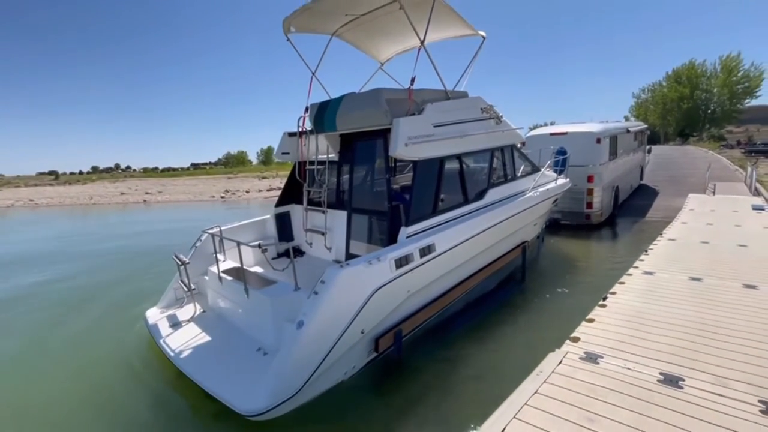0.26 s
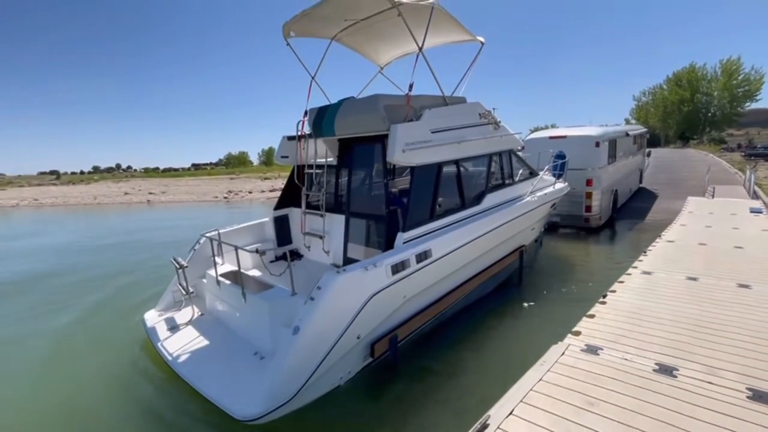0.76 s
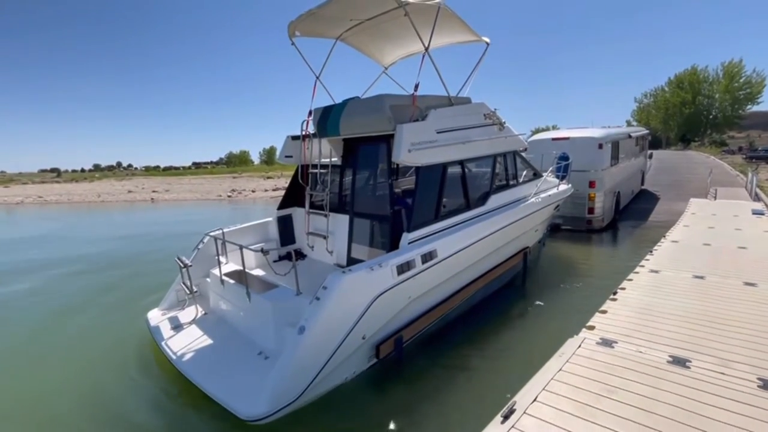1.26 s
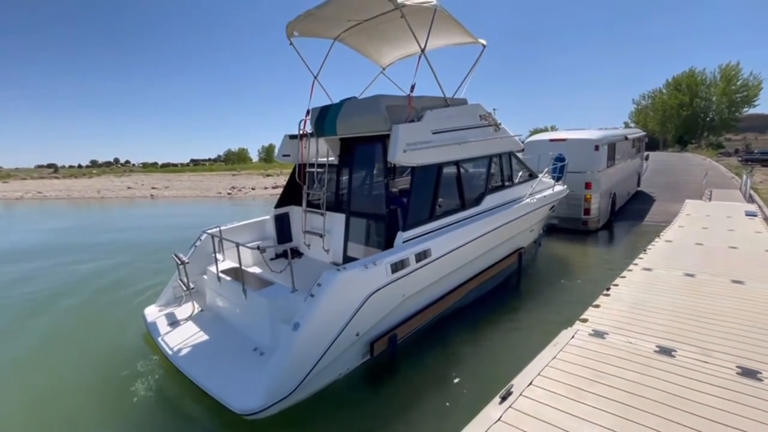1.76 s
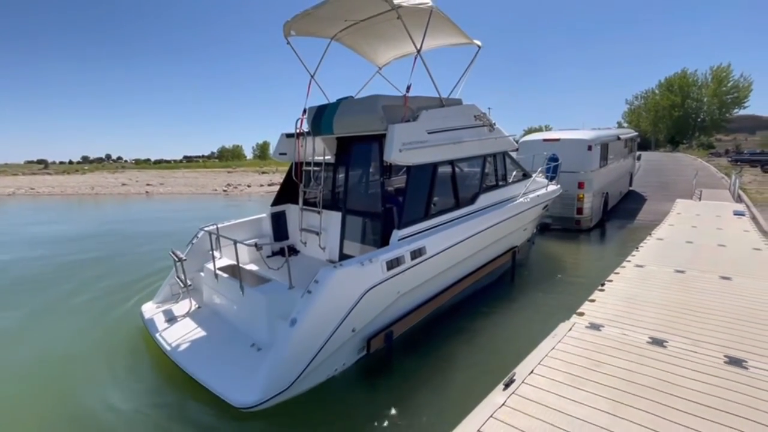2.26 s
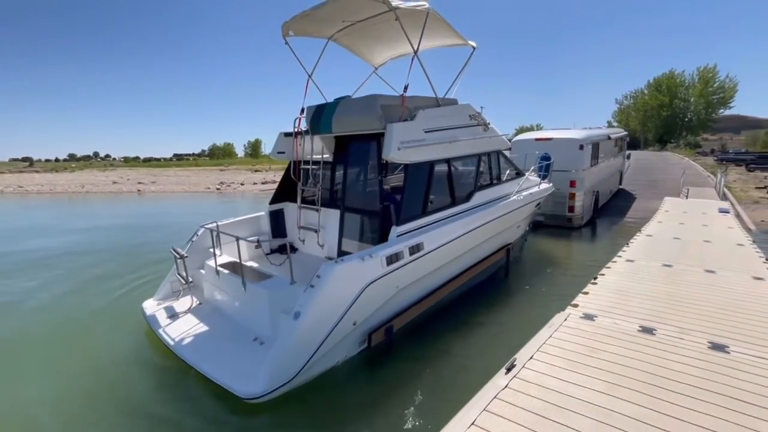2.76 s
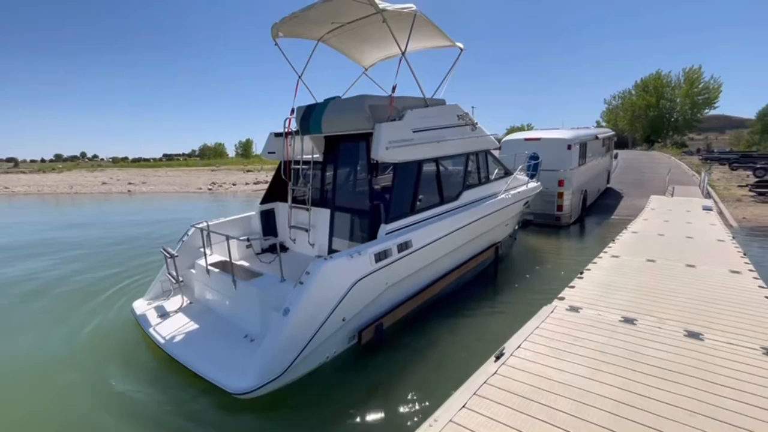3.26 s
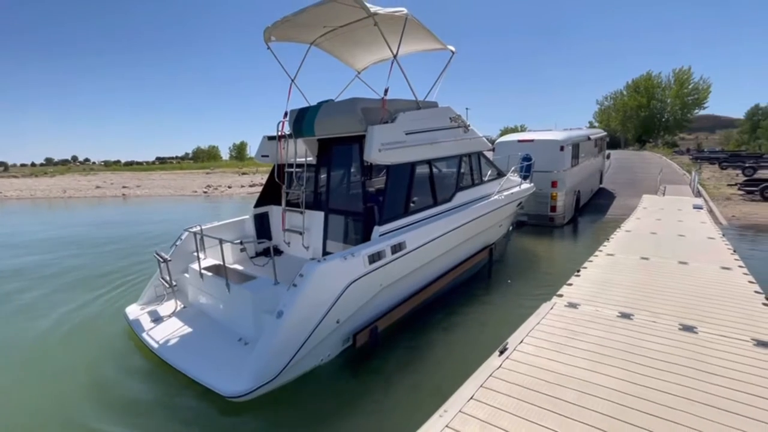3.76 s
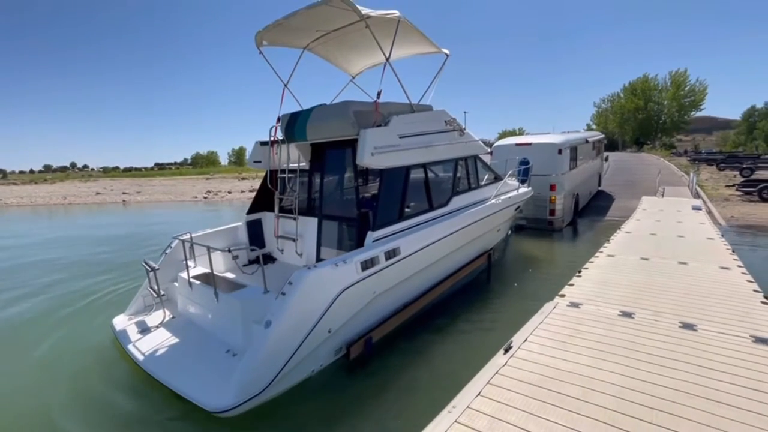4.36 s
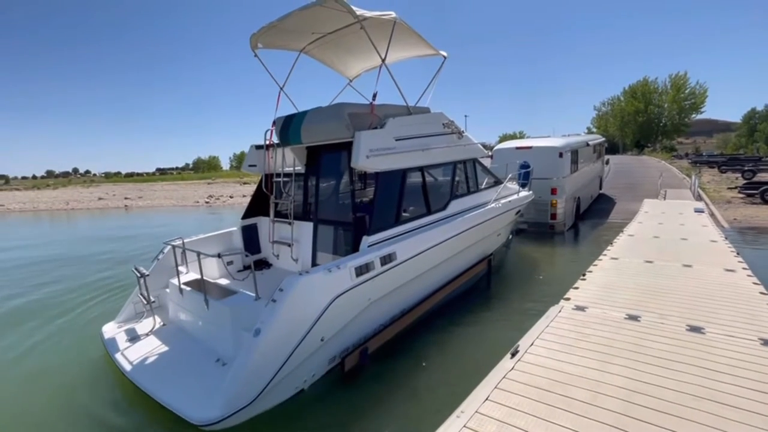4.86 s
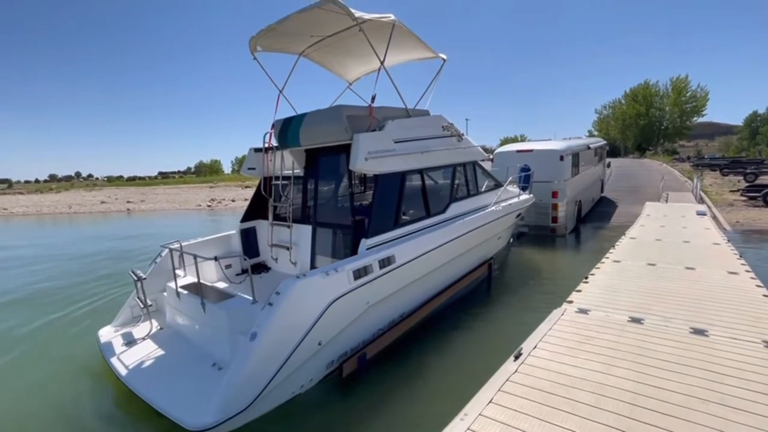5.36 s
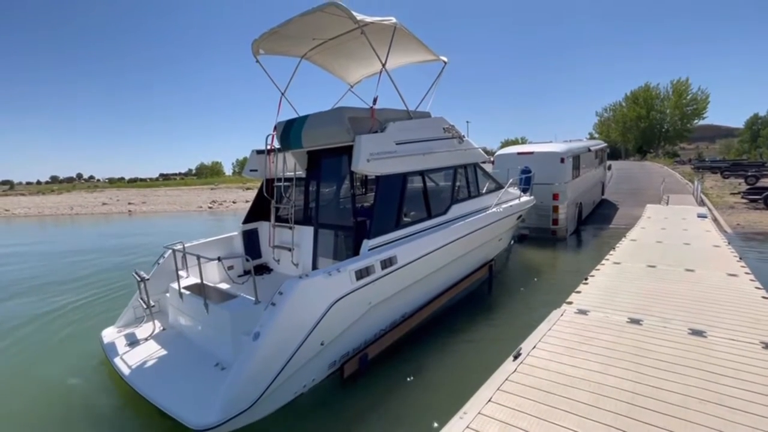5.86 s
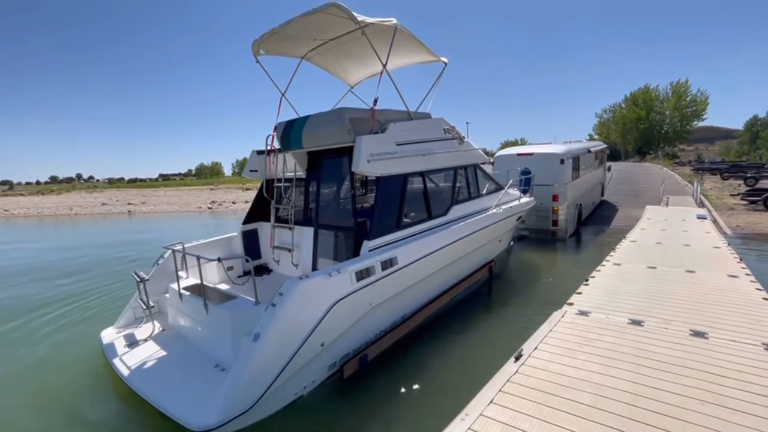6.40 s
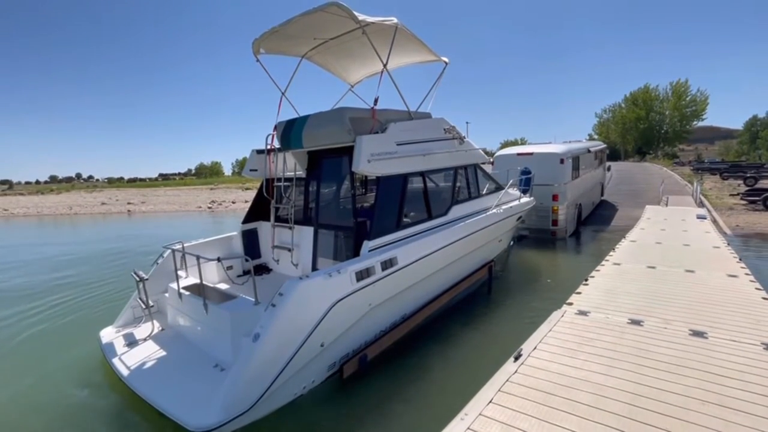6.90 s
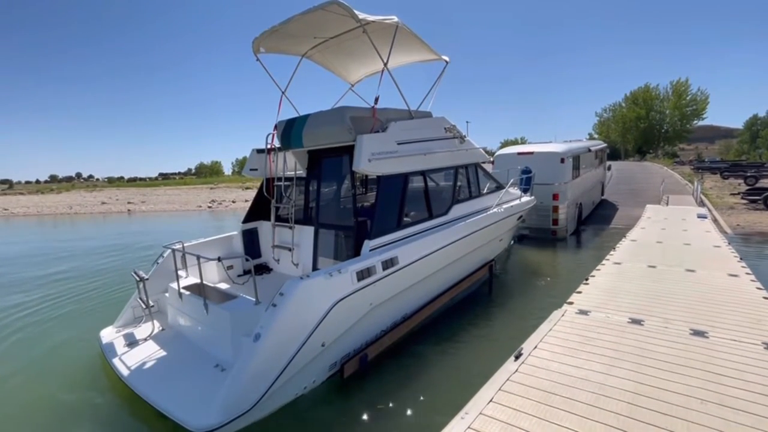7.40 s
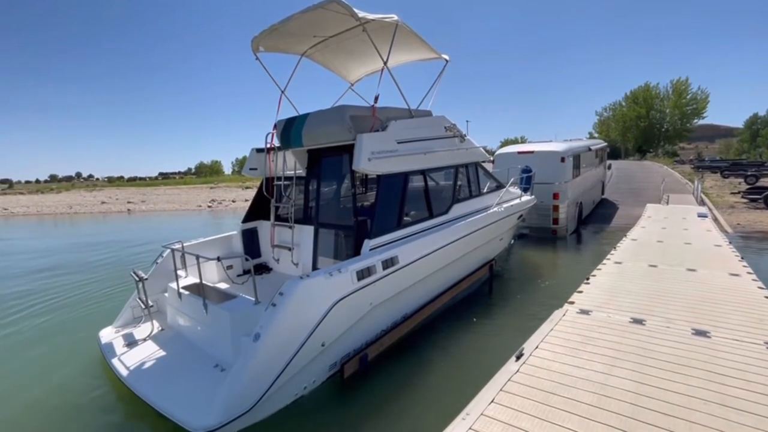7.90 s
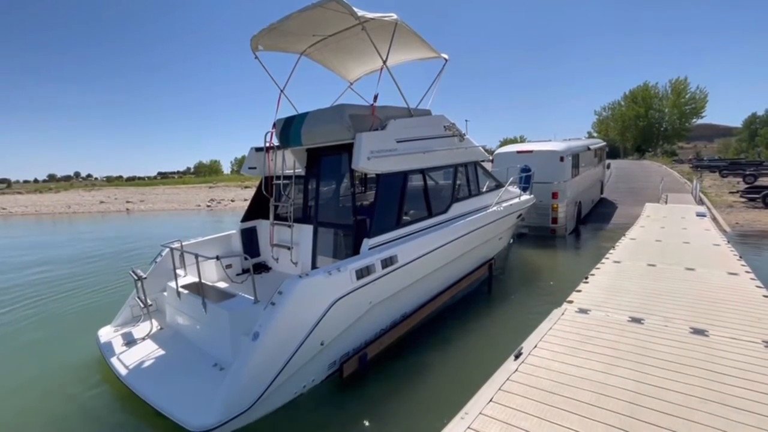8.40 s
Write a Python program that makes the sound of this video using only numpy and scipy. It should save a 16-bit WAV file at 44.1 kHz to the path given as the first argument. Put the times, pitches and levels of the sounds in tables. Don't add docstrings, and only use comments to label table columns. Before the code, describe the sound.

A big engine idles with an uneven lope by the water while vehicle brakes groan, blast air with a falling whistle, squeak, then vent softly.

```python
import sys
import numpy as np
from scipy import signal
from scipy.fft import rfft, irfft, dct
from scipy.io import wavfile
from scipy.ndimage import uniform_filter1d

SR = 44100
rng = np.random.default_rng(int(sys.argv[2]) if len(sys.argv) > 2 else 0)


def decibels_to_gain(level_db):
    exponent = np.asarray(level_db, float) / 20
    return 10 ** exponent


def wav_record(signal):
    frames = np.transpose(np.atleast_2d(signal))
    bounded = np.clip(frames, -1, 1)
    quanta = np.round(bounded * 32767).astype(np.int16)
    wavfile.write(sys.argv[1], SR, quanta)


N = 381024
T = np.arange(N) / SR

# time_s, cycle_hz
CRANK = [(0.0, 12.672), (1.6, 12.698), (2.4, 12.674), (2.8, 12.709), (3.2, 12.836), (4.4, 12.823),
         (5.2, 12.751), (6.4, 12.725), (6.8, 12.752), (7.75, 12.748)]
FIRINGS = [(.1889, 2.035), (.3601, 1.164), (.6388, .302), (.69, 2.145), (.914, .501), (.9433, .92)]
# time_s, level_db
FACING = [(0.0, 0.3), (1.0, -.9), (1.7, -3.4), (2.4, -3.4), (3.6, -2.5), (4.6, -2), (5.3, -4), (5.9, -3.6),
          (6.4, -5), (7.5, -4.6), (8.64, -9)]
FUEL_STOPS_S, FUEL_STOP_RISE_S = 7.79, .04
ENGINE_CUT_DB, ENGINE_FADE_DB = -5, -8


def evened(x):
    return x / np.sqrt(np.mean(x ** 2) + 1e-20)


def columns(rows):
    s, *values = np.transpose(rows)
    return [np.interp(T, s, v) for v in values]


def span(start, end):
    return slice(max(round(start * SR), 0), round(end * SR))


def wander(hz, count=1):
    size = N // 32
    smooth = 1 + (np.fft.rfftfreq(size, 32 / SR) / hz) ** 4
    spectrum = rfft(rng.standard_normal((count, size))) / smooth
    return evened(irfft(spectrum, size)).repeat(32, axis=1)


def coloured(x, points):
    f, db = np.transpose(points)
    log_hz = np.log(np.fft.rfftfreq(N, 1 / SR) + 1)
    gain = decibels_to_gain(np.interp(log_hz, np.log(f + 1), db, -120, -120))
    return evened(irfft(rfft(x) * gain, N))


def noise(points):
    return coloured(rng.standard_normal((2, N)), points)


def bounced(x, bumps):
    f = np.fft.rfftfreq(N, 1 / SR)
    gain_db = sum(db * np.exp(-((f - hz) / width) ** 2) for hz, width, db in bumps)
    return irfft(rfft(x) * decibels_to_gain(gain_db), N)


def swell(start, rise, hold, db, shape, t=T):
    rise_power, fall_db, fall_power = shape
    after = np.maximum(t - start - rise - hold, 0)
    fall = decibels_to_gain(np.maximum(db + fall_db * after ** fall_power, -150))
    return np.clip((t - start) / rise, 0, 1) ** rise_power * fall


def fuel_cut_db(step_db, fade_db, power=1):
    drop = step_db * np.clip((T - FUEL_STOPS_S) / FUEL_STOP_RISE_S, 0, 1)
    return drop + fade_db * np.maximum(T - FUEL_STOPS_S, 0) ** power


def strokes(turns, pattern, power):
    return sum(a ** power * (np.diff((turns - place) // 1, prepend=-1) > 0) for place, a in pattern)


def jet(gain, points, flicker_db):
    return gain * decibels_to_gain(flicker_db * wander(40.0)) * noise(points)


def tone(start, end, hz, levels, wobble, flutter_db):
    on, out = span(start, end), np.zeros(N)
    flutter = wander(30.0, count=len(levels))[:, on]
    turns = np.cumsum(hz * (1 + wobble * wander(62.0)[0, on])) / SR
    stack = sum(decibels_to_gain(db + flutter_db * flutter[k]) * np.cos(2 * np.pi * (k + 1) * turns)
                for k, db in enumerate(levels))
    edge = np.clip(np.minimum(T[on] - start, end - T[on]) / .012, 0, 1)
    out[on] = np.sqrt(2) * stack * edge
    return out


def crank_turns():
    off_s, sag_hz_per_s = 7.78, 3.75
    cycle_hz = columns(CRANK)[0] - sag_hz_per_s * np.maximum(T - off_s, 0)
    return np.cumsum(cycle_hz) / SR


def exhaust(turns):
    # cycle_order, rms_db
    order_levels = [(3, -47.5), (4, -43), (5, -47), (6, -41), (7, -54.5), (8, -52.5), (9, -32), (10, -39.5),
                    (11, -38), (12, -20.5), (13, -31.0), (14, -39.5), (15, -40), (16, -32.5), (17, -34.5),
                    (18, -36), (19, -36.5), (21, -41.5), (22, -31), (23, -32), (24, -42), (25, -37.5),
                    (26, -43), (28, -50), (32, -47.5), (33, -57.5), (34, -48.5), (35, -46.5), (36, -54)]
    pipe_hz, pipe_width_hz, pipe_turn_rad = 253.5, 188, -.654
    facing_db = columns(FACING)[0]
    boom_db = .6 + .25 * facing_db
    firing_db = boom_db + fuel_cut_db(-2.8, -14, 3.0)
    low_db = boom_db + fuel_cut_db(ENGINE_CUT_DB, ENGINE_FADE_DB)
    growl_db = -1.4 - .4 * facing_db + fuel_cut_db(ENGINE_CUT_DB, ENGINE_FADE_DB)
    place, strength = np.transpose(FIRINGS)
    flutter, out = wander(8.0, count=4), np.zeros(N)
    firing, low, growl = (decibels_to_gain(db + 0.18 * flutter[3]) for db in (firing_db, low_db, growl_db))
    for order, db in order_levels:
        hz = order * CRANK[0][1]
        pipe = 1j * hz / (pipe_hz ** 2 - hz ** 2 + 1j * hz * pipe_width_hz)
        firings = np.sum(strength * np.exp(-2j * np.pi * order * place))
        lag = np.angle(pipe * firings) + pipe_turn_rad
        load = firing if order == 12 else low if order < 14.5 else growl
        shake = .004 * order * flutter[int(order) % 3]
        out += decibels_to_gain(db) * load * np.cos(2 * np.pi * order * turns + lag + shake)
    return np.sqrt(2) * out


def block(turns):
    # pitch_hz, density_db (dB per Hz)
    rumble_colour = [(25, -29), (45, -7), (60, -7), (150, -7), (300, -1.5), (360, -4), (450, -18.5),
                     (560, -13)]
    clatter_colour = [(260, -37), (450, 0.5), (478, -11), (514, -17), (615, -14.5), (670, -10.5),
                      (807, -2.5), (863, -2.5), (940, -4.5), (1050, -6), (1130, -10.5), (1550, -14.5),
                      (2200, -25), (2860, -58), (4840, -120)]
    fizz_colour = [(1180, -7), (2000, -5), (2360, -3), (2830, -2), (3190, -4.5), (3540, -5), (5050, -13.5),
                   (5600, -17.5), (6480, -11), (7450, -21.5), (8190, -20), (10500, -27), (12500, -30),
                   (14000, -26.5), (14900, -39.5), (15800, -56)]
    facing_db = columns(FACING)[0]
    puff = sum((a / 2) ** 3 * np.exp(-((turns - place) % 1) / 0.037) for place, a in FIRINGS)
    knocks = strokes(turns, FIRINGS, 0.6) * decibels_to_gain(1.3 * rng.standard_normal(N))
    knocks = coloured(knocks, clatter_colour) * [[1], [0]]
    clatter = noise(clatter_colour) * (1 + 0.34 * puff) * decibels_to_gain(.9 * wander(15.0))
    clatter = evened(clatter + 0.27 * knocks)
    fizz = evened(noise(fizz_colour) * (1 + 0.57 * puff) * decibels_to_gain(1.1 * wander(20.0)))
    rumble = decibels_to_gain(-36 + fuel_cut_db(0.1, -4)) * noise(rumble_colour)
    return rumble + decibels_to_gain(-36 + facing_db) * clatter + decibels_to_gain(-46 + 1.1 * facing_db) * fizz


def rattle(turns):
    # cycle_order, rms_db
    rattle_levels = [(40, -53.5), (42, -60), (43, -62), (46, -57), (51, -58.5), (53, -51.5), (55, -57),
                     (60, -52.5), (64, -51), (68, -52.5), (70, -53.5), (83, -54), (99, -59.5), (107, -59),
                     (125, -58)]
    sway = wander(4.6, count=len(rattle_levels) + 1)
    facing_db = np.interp(T, [4.6, 5.6], [-9, 0])
    shaken = turns + .002 * sway[-1]
    lines = np.zeros(N)
    for (order, db), s in zip(rattle_levels, sway):
        level = decibels_to_gain(db + 2.4 * s + (order < 50) * facing_db)
        lines += level * np.cos(2 * np.pi * (order * shaken + rng.random()))
    return np.sqrt(2) * lines * decibels_to_gain(fuel_cut_db(ENGINE_CUT_DB, ENGINE_FADE_DB) - 4)


def far_engine():
    # cycle_order, rms_db
    far_levels = [(3, -50.5), (4, -38.5), (5, -44), (6, -38), (8, -38.5), (10, -40.5)]
    cycle_hz = 15.0 * (1 + 0.0062 * wander(0.68)[0])
    turns = np.cumsum(cycle_hz) / SR
    sway = wander(3.0, count=len(far_levels))
    lines = sum(decibels_to_gain(db + 2.2 * s) * np.cos(2 * np.pi * (order * turns + rng.random()))
                for (order, db), s in zip(far_levels, sway))
    return np.sqrt(2) * lines


def air_leak():
    # pitch_hz, density_db (dB per Hz)
    leak_colour = [(1500, -9), (2250, -14), (2900, 0.1), (3600, -9), (5500, -17), (6400, -5), (7600, -20),
                   (14500, -27), (15100, -45)]
    gain = swell(start=-.1, rise=.2, hold=2.8, db=-54, shape=(.7, -60, 1.0))
    return jet(gain, leak_colour, 1.1)


def groans():
    # start_s, rise_s, hold_s, fall_db (after 1 s), level_db
    groan_rows = [
        (-.1, .12, 1.21, -170, -30.7),
        (3.86, .72, .1, -14, -25.5),
    ]
    # first_hz, last_hz, settle_s
    groan_pitch = [(394, 411, .25), (391, 405, .8)]
    ends_s = (1.29, 5.6)
    out, stutter_db = np.zeros(N), -3 * abs(wander(18.0)[0]) * (T < .36)
    for (start, rise, hold, fall_db, db), (first, last, settle), end in zip(groan_rows, groan_pitch, ends_s):
        on = span(start, end)
        hz = last + (first - last) * np.exp(-(T[on] - start) / settle)
        sung = tone(start, end, hz, [stutter_db[on]], 0.0016, 0.35)
        out += swell(start, rise, hold, db, (.6, fall_db, 1)) * sung
    return out


def ticks():
    # start_s, peak_db, length_s
    short_ticks = [(1.124, -50, .003), (1.1443, -42, 0.004), (1.23, -45, 0.004), (1.5524, -47, 0.004),
                   (1.5994, -50, 0.004), (2.062, -57, 0.004), (2.5122, -40, 0.004), (2.5725, -44, 0.004),
                   (2.607, -47, 0.004), (2.6374, -51, .003), (5.0968, -55, .003), (5.45, -56, .003),
                   (5.5453, -58, .003), (6.4587, -57, .003), (8.3754, -58, .003)]
    long_scuffs = [(1.22, -53, .015), (2.29, -53, .03), (2.31, -51, .03), (2.52, -55, .02),
                   (2.58, -55, .02), (2.76, -56, .04), (2.8, -55, .04), (7.74, -60.5, .02)]
    shape = np.zeros(N)
    for s, db, length in short_ticks + long_scuffs:
        on = span(s, s + .3)
        attack = np.clip((T[on] - s) / .0007, 0, 1)
        shape[on] += decibels_to_gain(db - 2.5) * attack * np.exp(-(T[on] - s) / max(length, 1e-4))
    return shape * noise([(3000, -21), (6000, 2), (9000, 3), (12000, -1), (14000, 1.5), (15800, -15.5)])


def air_dump():
    # pitch_hz, density_db (dB per Hz)
    blast_colour = [(1120, -24), (1900, -3), (2020, -17.5), (2350, -7.5), (2760, -3), (3010, 0), (3860, -3),
                    (5130, -3), (5650, -6.5), (6340, 4.5), (7370, -7.5), (8200, 0), (11900, -5.5),
                    (14200, -3), (15800, -8)]
    blast = swell(start=2.897, rise=.073, hold=0.03, db=-24, shape=(2.1, -48, 1.3))
    bleed = swell(start=2.95, rise=.1, hold=0.01, db=-41, shape=(1.1, -11.5, 1.2))
    return jet(np.hypot(blast, bleed), blast_colour, .8)


def whistle():
    # time_s, pitch_hz, pressure_db
    valve_glide = [(2.915, 570, -38), (2.931, 590, -28), (2.955, 705, -31), (2.97, 876, -20),
                   (3.02, 836, -22.5), (3.117, 712, -26), (3.239, 630, -29), (3.403, 582, -39),
                   (3.6, 561, -51)]
    partials_db = [0.1, -2.5, -14, -21, -18, -20]
    # pitch_hz, width_hz, gain_db
    air_line = [(560, 42, -26), (625, 25, -4), (680, 40, -4), (785, 15, 10), (745, 12, -12), (876, 16, 9),
                (1182, 24, 10), (1285, 16, -18), (1208, 9, -16), (1450, 60, 7), (1590, 45, -12),
                (1750, 30, 5), (1890, 50, 9), (2150, 120, -1.5), (2330, 40, -10), (2600, 60, 4)]
    start, end = valve_glide[0][0], valve_glide[-1][0]
    hz, pressure_db = np.array(columns(valve_glide))[:, span(start, end)]
    levels = []
    for k, db in enumerate(partials_db):
        line_db = sum(b * np.exp(-(((k + 1) * hz - f) / w) ** 2) for f, w, b in air_line)
        levels.append(pressure_db + db + line_db)
    return tone(start, end, hz, levels, .008, 2.4)


def drag():
    # pitch_hz, density_db (dB per Hz)
    lining = [(1500, -14), (2450, 0.1), (2750, -5), (3000, -1), (3300, -7), (3600, -1), (4500, -14),
              (9000, -20)]
    gain = swell(start=3.8, rise=.2, hold=.95, db=-49.5, shape=(.7, -45, 1))
    return gain * decibels_to_gain(1.5 * wander(9.0)) * noise(lining)


def squeak(start, length, hz, db, over_db):
    place = np.clip((T[span(start, start + length)] - start) / length, 0, 1)
    sag = 1 - np.sin(np.pi * place ** .75)
    level = db - 7 * sag
    levels = [level, level + over_db, level + over_db - 1.5]
    return tone(start, start + length, hz * (1 - .02 * sag), levels, .013, 2.4)


def squeaks():
    # start_s, length_s, top_pitch_hz, level_db, overtones_db
    squeak_rows = [(3.92, .25, 1310, -48.5, -6), (3.93, .12, 2400, -52, -30), (3.96, .2, 3020, -52, -30),
                   (4.02, .14, 2570, -52, -30), (4.145, .09, 2925, -41, -35), (4.22, .11, 3025, -38, -35),
                   (4.32, .1, 2875, -40, -35), (4.44, .16, 1185, -59, 10), (4.62, .3, 1230, -66, 10),
                   (4.89, .135, 1165, -31, -22), (5.025, .065, 1080, -39, -22)]
    smear = rng.standard_normal(3500) * np.exp(-T[:3500] / 0.024)
    direct = sum(squeak(*row) for row in squeak_rows)
    return .8 * direct + 0.4 * signal.oaconvolve(direct, smear / np.linalg.norm(smear))[:N]


def air_vent():
    # pitch_hz, density_db (dB per Hz)
    vent_colour = [(1120, -54), (1900, -20), (2390, -2.5), (3040, -3), (3290, -4.5), (3660, -0.5),
                   (4040, -8), (5080, -1), (5600, -7.5), (6510, 4), (7440, -6), (8200, -5.5), (10700, -12),
                   (14500, -7), (15800, -9)]
    gain = swell(start=5.643, rise=.17, hold=.4, db=-34, shape=(.58, -1000, 1.9))
    return jet(gain, vent_colour, .7)


def coasting(turns):
    # pitch_hz, width_hz, level_db
    muffler = [(63, 41, -5.5), (102, 40, -2), (199, 47, 3.5), (282, 49, 1), (416, 90, -12)]
    pop_places = [(0.299, 0.91), (.84, 0.54)]
    t = T[:6000]
    ring = sum(decibels_to_gain(db) * np.exp(-np.pi * width * t) * np.sin(2 * np.pi * hz * t) for hz, width, db in muffler)
    ring = ring * (1 - np.exp(-t / 0.0047))
    pops = signal.oaconvolve(strokes(turns, pop_places, 0.9), ring)[:N]
    onset = np.clip((T - FUEL_STOPS_S) / FUEL_STOP_RISE_S, 0, 1)
    return onset * decibels_to_gain(-28 + fuel_cut_db(0, -3)) * evened(pops)


def shimmer(x):
    patch_db, streak_db, calm_below_hz = 1.0, 1.5, 1800
    z = signal.stft(x, nperseg=1024, noverlap=768)[2]
    a, b = rng.standard_normal((2,) + z.shape[1:])
    patches = evened(uniform_filter1d(uniform_filter1d(a, size=12, axis=0), size=20, axis=1))
    streaks = uniform_filter1d(uniform_filter1d(b, size=3, axis=0), size=60, axis=1)
    streaks = evened(uniform_filter1d(streaks, size=40, axis=1))
    reach = np.clip(np.fft.rfftfreq(1024, 1 / SR) / calm_below_hz, .3, 1)[:, None]
    field = decibels_to_gain(reach * (patch_db * patches + streak_db * streaks))
    return signal.istft(z * evened(field), nperseg=1024, noverlap=768)[1][:, :N]


def ports(shared, apart, tones):
    # pitch_hz, likeness (0-1), left_right_db, right_leads_rad
    port_rows = [(60, 0.84, -3.5, .1), (278, 0.89, -2, 0.45), (744, 0.31, -7.5, 0.15), (1200, 1, -3, 1.56),
                 (1886, 0.49, -1.5, 2.67), (2270, 0.25, -4, 5.1), (2760, 0.57, -1.5, 6.2),
                 (3400, 0.92, 4, 7.46), (4470, .3, 2, 9.4), (6260, .4, 11, 12), (7900, .4, 1, 14),
                 (9600, .2, -2.5, 15), (10800, .6, -4, 15.7), (12200, 1, 1, 18.85)]
    f, *values = np.transpose(port_rows)
    same, balance_db, lead = (np.interp(np.fft.rfftfreq(N, 1 / SR), f, v) for v in values)
    same, gain, turn = np.clip(same, 0, 1), decibels_to_gain(balance_db / 2), np.exp(1j * lead)
    a, b, c = rfft(shared), rfft(apart), rfft(tones)
    mean = np.sqrt(gain ** 2 + gain ** -2 + 2 * same * np.cos(lead)) / 2
    left = gain * (a + c)
    right = turn / gain * (same * a + np.sqrt(1 - same ** 2) * b + c)
    return irfft(np.array([left, right]) / mean, N)


def scene():
    # pitch_hz, width_hz, gain_db
    jet_bands = [(2000, 110, -20), (3680, 60, 0.5), (4050, 90, -11), (4520, 70, -5), (5010, 70, 4),
                 (7250, 120, -3), (7980, 70, 1.5), (8600, 300, -2)]
    # pitch_hz, width_hz, gain_db
    deck_path = [(554, 60, 0), (1740, 120, 1.5), (2058, 72, -1.5), (3000, 120, 1), (3710, 82, 1.5),
                 (4080, 65, -1.5), (4530, 120, -4.5), (5030, 90, 1.5), (5530, 150, -2.5), (6190, 73, 1),
                 (7500, 200, -5), (8030, 72, 5), (10840, 280, -7.5), (12000, 250, -7), (12600, 2600, 2.5)]
    # time_s, left_right_db
    hand_turn = [(0, .4), (.8, .4), (1.5, -.2), (2.7, -.3), (3.7, .4), (4.4, .3), (5.2, -.1), (7, -.2),
                 (8.64, -.6)]
    turns = crank_turns()
    hiss = block(turns) + bounced(air_dump() + air_vent(), jet_bands)
    hiss += air_leak() + ticks() + drag()
    brakes = groans() + whistle() + squeaks()
    brakes += 0.26 * np.roll(brakes, 1500) + 0.086 * np.roll(brakes, 3100)
    tones = exhaust(turns) + rattle(turns) + far_engine() + coasting(turns) + brakes
    shared, apart = bounced(shimmer(hiss), deck_path)
    return ports(shared, apart, tones) * decibels_to_gain(columns(hand_turn)[0] * [[.5], [-.5]])


def starve(x, hop=1024, grid=435):
    # pitch_hz, zone_db
    dead_zone = [(700, -45), (1600, -30), (1860, -24), (2000, -9), (2130, -20), (3900, -22), (4060, -11),
                 (4250, -22), (4520, -13), (4800, -24), (6800, -26), (7350, -7), (7900, -15), (9000, -9),
                 (10200, -3), (10600, 5), (12400, 4), (13000, 2.5), (14400, 1.5), (15200, 3), (15600, 12),
                 (16000, 30)]
    # pitch_hz, level_db
    faintest = [(9500, -83), (10600, -72), (14300, -73), (14800, -63)]
    # pitch_hz, spread_db
    zone_luck = [(7000, 8), (10500, 7), (14400, 6), (14900, 4)]
    window = np.sin(np.pi * (np.arange(2 * hop) + .5) / (2 * hop))
    pair = np.pad([x[0] + x[1], x[0] - x[1]], ((0, 0), (2 * hop - grid, 3 * hop)))
    frames = pair.shape[1] // hop - 1
    places = np.arange(frames)[:, None] * hop + np.arange(2 * hop)
    a, b, c, d = np.split(pair[:, places] * window, 4, axis=2)
    z = dct(np.dstack([-c[..., ::-1] - d, a - b[..., ::-1]]), 4, norm="ortho")
    luck = rng.standard_normal((2, frames, hop // 16)).repeat(16, axis=2)
    hz = np.arange(hop) * SR / 2 / hop
    starved_db, faint_db, luck_db = (np.interp(hz, *np.transpose(rows))
                                     for rows in (dead_zone, faintest, zone_luck))
    zone_db = starved_db + luck_db * uniform_filter1d(luck, size=2, axis=1)
    nearby = np.sqrt(abs(uniform_filter1d(z ** 2, size=130)) + decibels_to_gain(faint_db) ** 2)
    z = z * (abs(z) > decibels_to_gain(zone_db) * nearby)
    u, v = np.split(dct(z, 4, norm="ortho"), 2, axis=2)
    out = np.dstack([v, -v[..., ::-1], -u[..., ::-1], -u]) * window
    lapped = out[:, 1:, :hop] + out[:, :-1, hop:]
    mid, side = lapped.reshape(2, -1)[:, hop - grid:][:, :N]
    return np.array([mid + side, mid - side]) / 2


def band_limit(x):
    return signal.sosfilt(signal.butter(12, 15980, fs=SR, output="sos"), x)


def record(dry):
    start_s, fall_s, hold_s, recovery_s, duck_db = 2.95, .07, .25, .15, -4.3
    times_s = np.cumsum([start_s, fall_s, hold_s, recovery_s])
    dry = dry * decibels_to_gain(np.interp(T, times_s, [0, duck_db, duck_db, 0]))
    limited = 1.6 * np.tanh(dry / 1.6)
    bass_cut = signal.filtfilt(*signal.butter(2, 28, "high", fs=SR), limited)
    return band_limit(starve(bass_cut))


dry = scene()
out = record(dry)
wav_record(out)
```